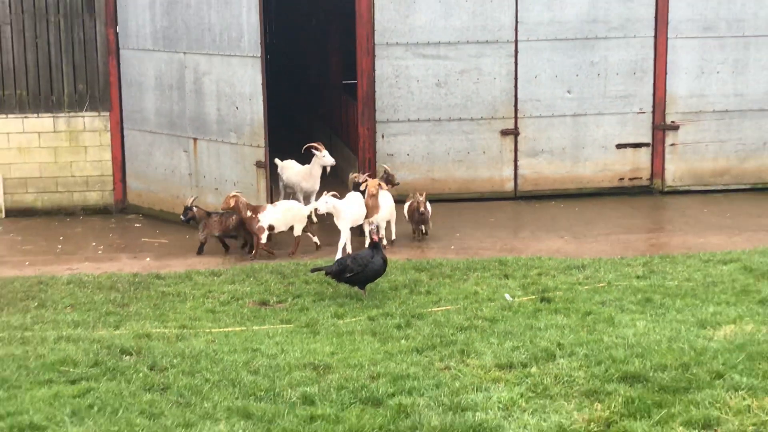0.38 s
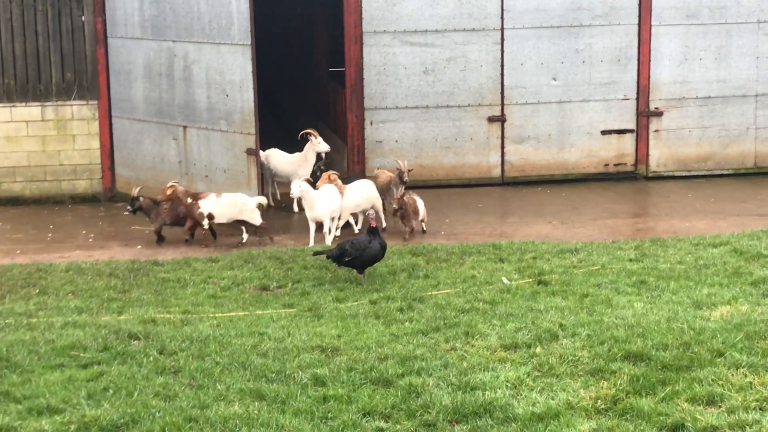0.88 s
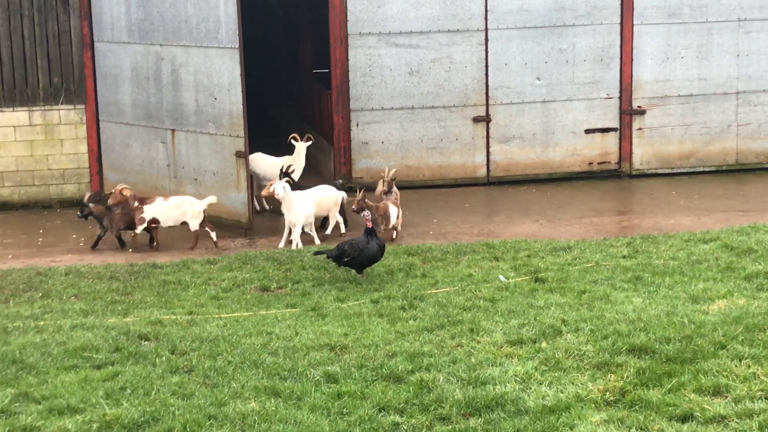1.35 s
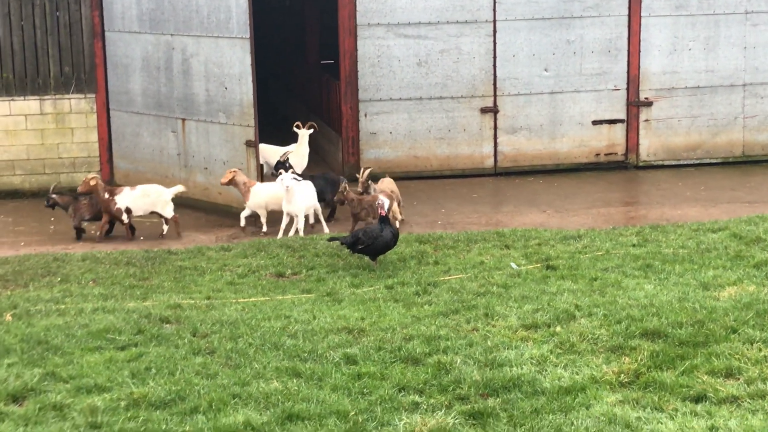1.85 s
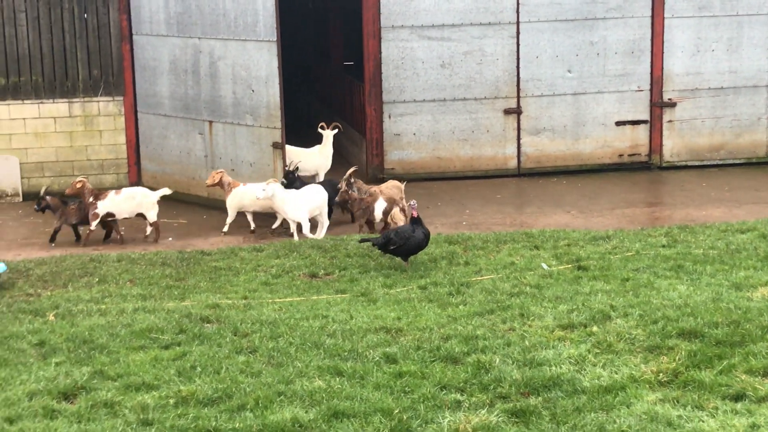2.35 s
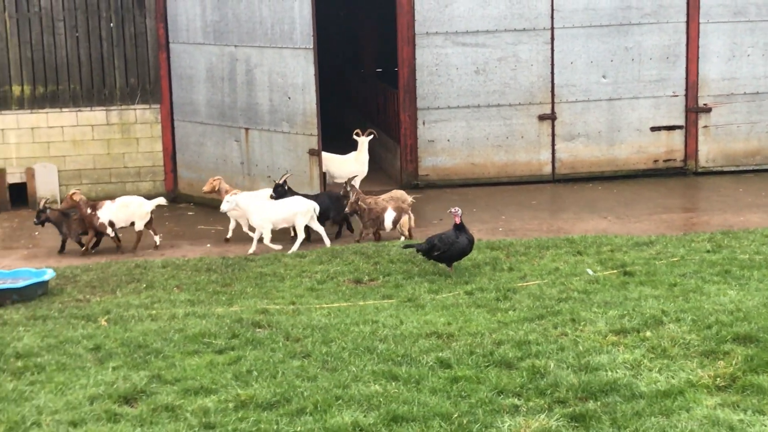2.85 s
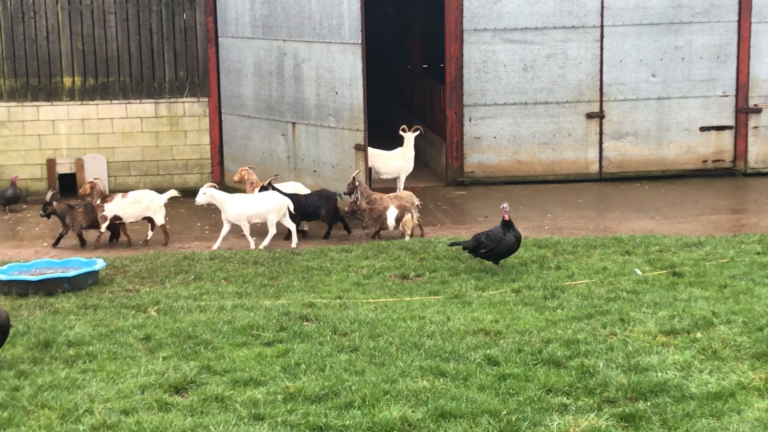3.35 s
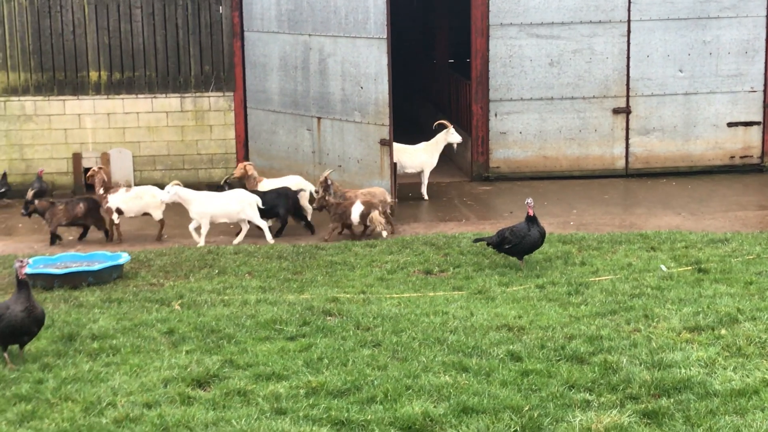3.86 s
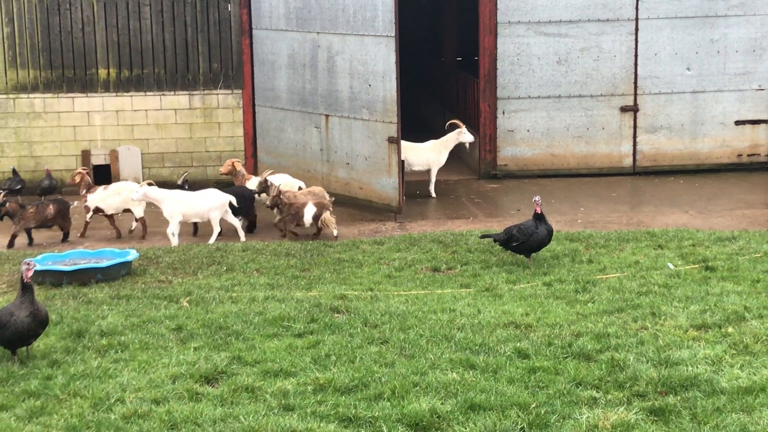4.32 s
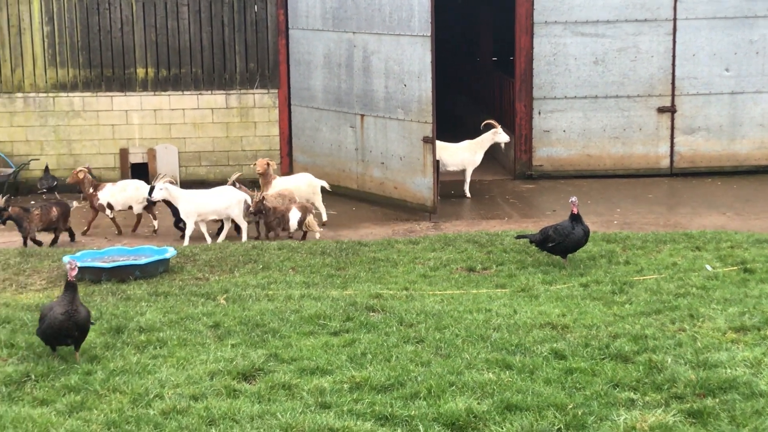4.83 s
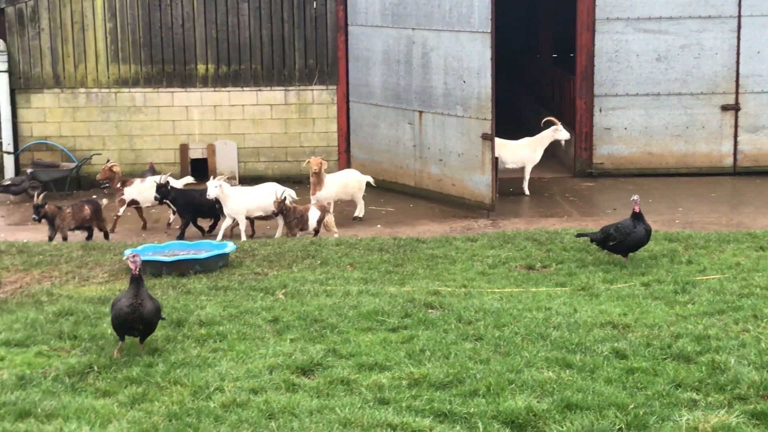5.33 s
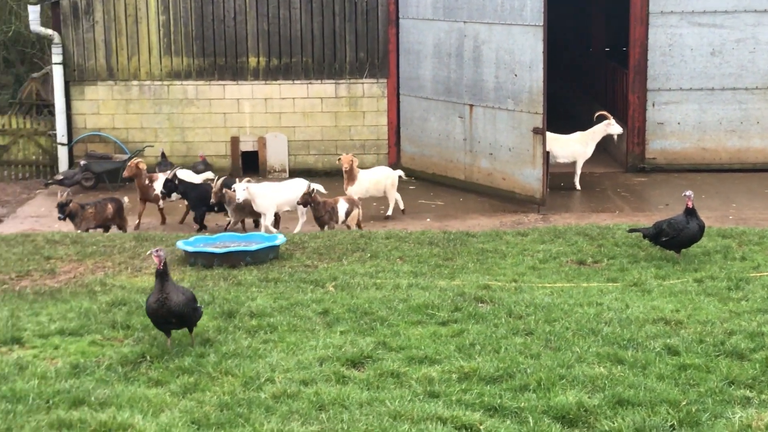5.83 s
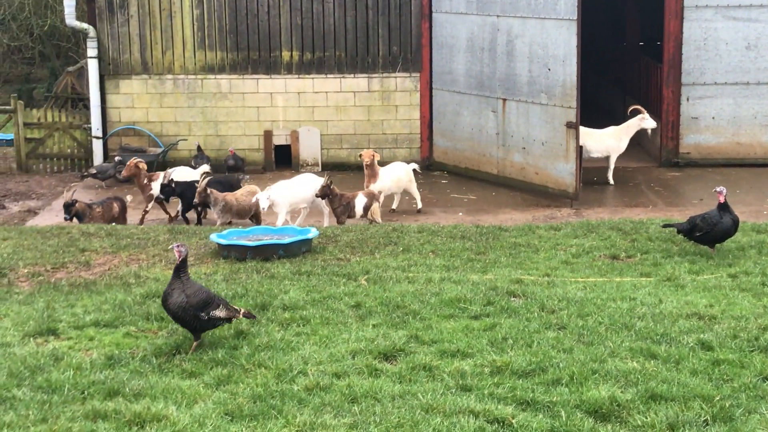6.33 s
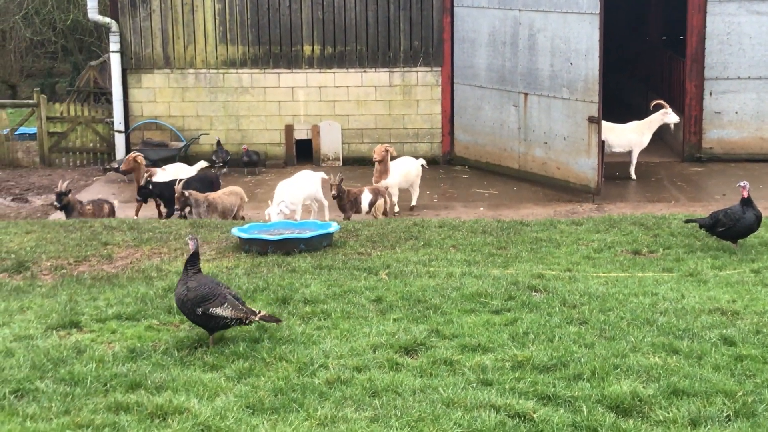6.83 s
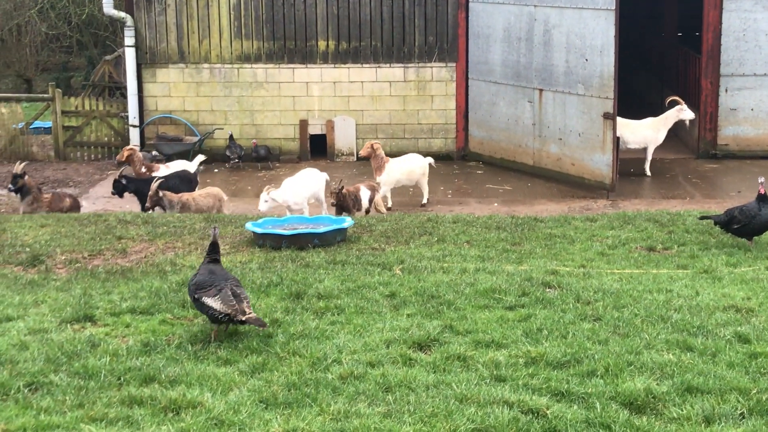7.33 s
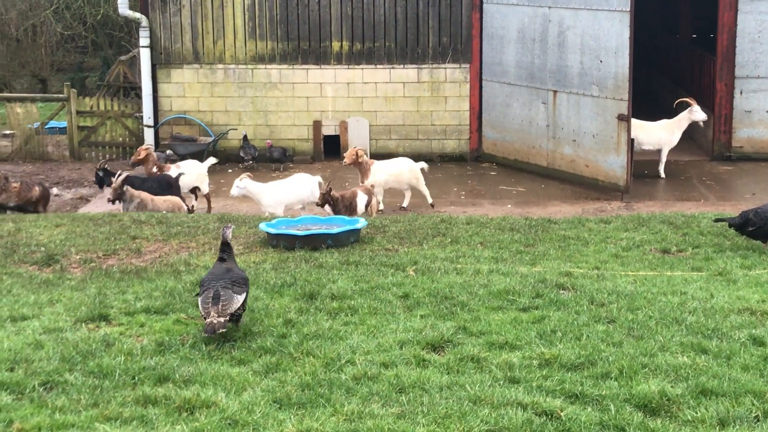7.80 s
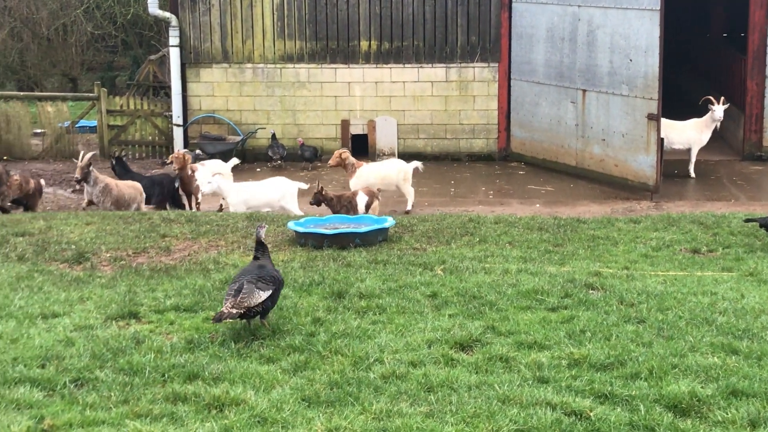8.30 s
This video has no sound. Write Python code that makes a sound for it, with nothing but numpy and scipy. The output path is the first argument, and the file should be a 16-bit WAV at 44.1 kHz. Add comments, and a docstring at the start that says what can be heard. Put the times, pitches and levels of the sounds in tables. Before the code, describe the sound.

Loud, short turkey yelps ring across a farmyard, followed by weaker hoarse clucks, with faint songbirds, light hoof taps and soft swishing steps.

```python
"""A farmyard in front of a sheet-metal shed: a near turkey yelps eight times, two membranes and rasping air;
a farther one clucks hoarsely on, a falling stack of partials through a throat peak, with a purr of clicks.
Songbirds whistle and trill in the hedges as gliding sines, goats' hooves ring briefly on wet concrete,
and short swishes of noise come in loose runs. Scattered reflections answer the animals over a low hum,
distant traffic and air."""
import sys
import numpy as np
from scipy import signal
from scipy.fft import rfft, irfft, next_fast_len
from scipy.io import wavfile
from scipy.ndimage import uniform_filter1d

SR = 44100
rng = np.random.default_rng(int(sys.argv[2]) if len(sys.argv) > 2 else 0)


def wrap_up_sound(samples):
    """Save the sound to the file named by the first command line argument, as 16-bit audio."""
    columns = np.atleast_2d(samples).T
    # keep every value between -1 and 1, then stretch to whole-number steps
    tamed = np.clip(columns, -1, 1)
    steps = np.round(tamed * 32767).astype(np.int16)
    wavfile.write(sys.argv[1], SR, steps)


def ratio_of_db(decibels):
    """Turn decibels (scalar or array-like) into linear amplitude factors; 0 dB maps to 1."""
    return 10 ** (np.asarray(decibels, float) / 20)


N = 382788  # samples

# Near turkey, one table a yelp. Each row: time in seconds, pitch in Hz, level in dB,
# beak opening as overtone level in dB.
YELPS = [
    [(0.194, 1238, -55, -7), (0.201, 1499, -34.5, -6), (0.21, 1421, -30, -42), (0.216, 1213, -28, -4.5),
     (0.262, 1190, -24.5, -20), (0.269, 1298, -29.5, -16), (0.318, 1275, -35.5, -10.5),
     (0.351, 1354, -38, -15), (0.363, 1507, -48, -13)],
    [(0.59, 1303, -53, -26), (0.596, 1478, -39.5, -34), (0.606, 1558, -24, -12), (0.612, 1207, -26.5, -3.5),
     (0.65, 1217, -21, -17.5), (0.656, 1323, -26, -13), (0.707, 1295, -33, -5.5), (0.755, 1505, -52, -20)],
    [(0.982, 1470, -46.5, -3), (0.994, 1516, -28.5, -13), (0.997, 1447, -27, -16),
     (1.003, 1207, -24.5, -3.5), (1.042, 1329, -23.5, -15), (1.069, 1314, -30.5, -1.5),
     (1.108, 1290, -35, -22), (1.138, 1346, -46, -7)],
    [(1.432, 1290, -50, -31), (1.444, 1400, -29.5, -11.5), (1.453, 1466, -26.5, -13),
     (1.459, 1383, -25.5, -13), (1.467, 1323, -23.5, -33), (1.472, 1122, -25.5, -11.5),
     (1.494, 1117, -21, -32), (1.499, 1316, -26.5, -9), (1.6, 1265, -34, -12), (1.62, 1217, -44, -43)],
    [(1.984, 1170, -40.5, -12), (1.996, 1459, -29, -18), (2.018, 1295, -27, -11.5), (2.024, 1109, -27, -14),
     (2.05, 1144, -22, -17.5), (2.078, 1101, -23.5, -26), (2.083, 1271, -27, -13.5),
     (2.137, 1234, -30.5, -16.5), (2.161, 1042, -27, -28), (2.178, 1150, -43, -15)],
    [(2.551, 1085, -64, -5), (2.56, 1488, -27, -44), (2.566, 1384, -31.5, -32), (2.572, 1213, -28.5, -17),
     (2.641, 1133, -26, -23.5), (2.668, 1208, -27.5, -38), (2.676, 1094, -27, -29), (2.735, 1035, -30, -31),
     (2.749, 1076, -49.5, -8.5)],
    [(3.214, 1287, -53, -40), (3.226, 1310, -33.5, -9), (3.256, 1119, -31.5, -11.5), (3.31, 1080, -24, -20),
     (3.337, 1214, -25, -39), (3.346, 1050, -25.5, -21), (3.409, 964, -29, -25), (3.415, 1070, -32.5, -32),
     (3.427, 1010, -53.5, -24)],
    [(3.675, 1250, -54, -25), (3.681, 1428, -31, -13), (3.69, 1427, -22.5, -38), (3.696, 1199, -28.5, -5.5),
     (3.745, 1141, -24.5, -25.5), (3.753, 1272, -24.5, -17.5), (3.81, 1244, -30, -16.5),
     (3.843, 1056, -30, -51), (3.853, 1080, -29.5, -28), (3.864, 1160, -59, -30)],
]
# The voice of each yelp. Each row: pitch of the lower membrane in Hz, its side tones in dB, rasp in dB,
# shine of the highest partials in dB, length of the rough voice break in seconds.
YELP_VOICE = [(800, -13.5, -23.5, -4, 0.0071), (800, -18.5, -30, -2, .004), (850, -19, -26, -9, 0.014),
              (800, -26, -27, -8.5, 0.0074), (800, -45, -22.5, -3.5, 0.018), (800, -26, -19.5, -7.5, 0.059),
              (600, -31, -32, -6.5, 0.0022), (800, -21, -23.5, -7.5, .03)]
# Throat and beak resonances of the yelp. Each row: frequency in Hz, gain in dB.
YELP_THROAT = [(250, -29), (500, -15.5), (800, -7.5), (1500, 7), (2500, -8.5), (3800, -3.5), (5000, -18.5),
               (6300, -7), (8500, -12), (11000, -25), (15000, -19.5)]
# Spectrum of the air rasping in the yelp. Each row: frequency in Hz, relative level in dB.
RASP = [(400, -37.5), (1400, 9), (2300, -8.5), (4300, -2.5), (6500, -17), (15000, -33)]
# Far turkey, one table a cluck. Each row: time in seconds, pitch in Hz, level in dB.
CLUCKS = [
    [(4.414, 800, -70), (4.428, 790, -45), (4.44, 747, -47.5), (4.448, 692, -41), (4.458, 670, -49),
     (4.485, 643, -69)],
    [(4.724, 800, -61), (4.746, 774, -44), (4.78, 730, -46), (4.818, 708, -63)],
    [(5.033, 840, -64), (5.056, 855, -35.5), (5.074, 844, -51.5), (5.1, 800, -50), (5.112, 760, -52),
     (5.122, 740, -47), (5.15, 630, -67)],
    [(5.355, 845, -60), (5.385, 862, -37.5), (5.405, 728, -53), (5.43, 614, -50), (5.445, 760, -47),
     (5.465, 730, -60)],
    [(5.675, 892, -62), (5.695, 863, -42), (5.706, 634, -49.5), (5.72, 644, -43.5), (5.732, 645, -54),
     (5.742, 636, -41), (5.76, 632, -50), (5.785, 630, -84)],
    [(6.008, 860, -60), (6.027, 837, -39.5), (6.036, 675, -53.5), (6.075, 630, -43.5), (6.095, 610, -57),
     (6.12, 603, -68)],
    [(6.357, 792, -58), (6.369, 800, -43), (6.405, 855, -40.5), (6.413, 636, -47), (6.43, 632, -42),
     (6.454, 636, -78)],
    [(7.135, 773, -59), (7.152, 800, -40.5), (7.168, 739, -37), (7.187, 558, -55), (7.2, 618, -43.5),
     (7.208, 720, -58)],
]
# The voice of each cluck. Each row: relative neck length (longer lowers the throat's peak),
# lift of the overtones at the start in dB, rasp when loudest in dB.
CLUCK_VOICE = [(1.24, -16, -13.5), (1.08, 9, -12), (1.09, 7, -15), (1.05, 8, -14.5), (0.91, 4.5, -7),
               (0.94, -1, -8.5), (0.94, 1, -10.5), (1.374, -2.5, -27.5)]
# Throat resonances of the cluck. Each row: frequency in Hz, gain in dB.
CLUCK_THROAT = [(500, -12.5), (900, -16.5), (1400, -1.5), (1900, 1.5), (2500, -10), (3400, -15),
                (5000, -24), (9000, -40.5)]
# Soft turkey peeps. Each row: start in seconds, length in seconds, first pitch in Hz, last pitch in Hz,
# peak level in dB.
PEEPS = [(7.064, 0.045, 1072, 1027, -52), (7.104, .036, 1030, 896, -46), (7.203, 0.018, 850, 1140, -45.5),
         (8.054, 0.032, 1440, 1240, -55), (8.14, .03, 1290, 1360, -67), (8.444, 0.055, 1230, 1495, -64)]
# Whistled songbird notes. Each row: start in seconds, length in seconds, first pitch in Hz,
# last pitch in Hz, peak level in dB.
WHISTLES = [ (0.038, 0.024, 4190, 3400, -52.5), (0.099, 0.032, 4630, 3860, -51.5),
            (0.139, 0.043, 6730, 5500, -56.5), (0.921, 0.026, 5200, 6340, -67),
            (1.21, 0.038, 3600, 3900, -60), (1.232, .035, 5500, 7140, -61), (1.3, 0.038, 4860, 5600, -61.5),
            (1.43, .047, 3600, 4250, -57), (1.935, 0.027, 3900, 4300, -63),
            (2.204, 0.12, 4300, 3550, -58.5), (2.316, 0.064, 4360, 3900, -63),
            (2.98, 0.11, 7046, 6800, -73), (2.984, 0.075, 7890, 7450, -76), (3.11, 0.065, 3580, 3630, -69),
            (3.17, 0.035, 4900, 5280, -65.5), (3.198, 0.038, 4970, 4780, -68),
            (3.38, 0.062, 4950, 4600, -70), (3.45, .03, 4600, 4520, -68), (3.61, 0.065, 8000, 7000, -51),
            (3.603, 0.061, 9680, 8260, -56), (4.261, 0.026, 2500, 2160, -63),
            (4.301, 0.025, 2130, 2440, -61.5), (4.299, 0.028, 3400, 3780, -59.5),
            (4.422, 0.017, 5400, 6000, -68), (4.433, 0.078, 6000, 6000, -60.5),
            (4.425, 0.096, 5020, 4990, -65), (4.627, 0.079, 6700, 6710, -62),
            (4.652, 0.031, 5800, 5050, -58.5), (4.662, 0.13, 4990, 4925, -59.5),
            (4.69, 0.11, 6180, 6300, -64.5), (4.921, .045, 3200, 3550, -65.5),
            (4.966, 0.049, 3550, 3940, -58.5), (5.02, 0.051, 3950, 4300, -57),
            (5.193, .022, 3930, 3170, -59), (5.215, 0.054, 3650, 3860, -56),
            (5.278, 0.032, 3900, 4310, -56), (5.455, 0.049, 4500, 3670, -66),
            (5.501, 0.073, 3570, 3150, -64), (6.152, 0.045, 3450, 2950, -61.5),
            (6.195, 0.052, 2850, 2730, -64), (6.29, 0.022, 3100, 3400, -57),
            (6.315, 0.022, 3330, 2000, -50), (6.486, 0.037, 3870, 3850, -59),
            (6.553, 0.053, 4500, 4450, -68), (6.63, 0.053, 4350, 4250, -67), (6.693, .03, 4200, 4100, -66),
            (6.895, 0.036, 5750, 5684, -69.5), (6.95, .055, 5940, 6190, -75),
            (7.651, 0.084, 8200, 8500, -69.5), (7.672, 0.038, 7640, 7900, -64.5),
            (7.688, .06, 4110, 3410, -64), (7.745, 0.026, 3620, 3030, -63), (7.81, 0.1, 7620, 8050, -64),
            (7.885, .068, 8200, 8460, -68), (7.955, 0.058, 7200, 7735, -66.5),
            (8.013, .04, 6900, 7400, -69), (8.058, 0.031, 6970, 7200, -65.5),
            (8.087, 0.055, 7768, 7230, -62), (8.14, 0.036, 8500, 8340, -60),
            (8.188, 0.068, 6950, 7000, -64.5), (8.2, 0.058, 7600, 7840, -66),
            (8.324, 0.013, 4800, 7600, -60), (8.327, .03, 7300, 7940, -57.5),
            (8.35, 0.083, 8060, 7730, -57.5), (8.466, 0.028, 8700, 8500, -62),
            (8.501, 0.043, 8550, 8560, -62.5), (8.582, .022, 3760, 3870, -51),
            (8.591, .045, 4550, 3530, -58), (8.596, 0.054, 3550, 3240, -56.5),
            (8.647, 0.038, 3800, 3500, -57.5), ]
# Buzzy songbird trills, one table a trill. Each row: time in seconds, top pitch in Hz,
# level in dB ahead of the mix, down-slur in Hz, notes a second.
TRILLS = [
    [(1.26, 7130, -52, 600, 81), (1.35, 7230, -51, 887, 60), (1.5, 7050, -53.5, 1208, 43),
     (1.75, 6800, -64, 1170, 55)],
    [(6.54, 8760, -65, 500, 28), (6.65, 7790, -59.5, 600, 31), (6.85, 7100, -58, 900, 28),
     (7.0, 7350, -62, 300, 19), (7.16, 6850, -74, 300, 43)],
]
# Short swishes, as of feet through wet grass. Each row: middle in seconds, level in dB, length in ms.
PUFFS = [(.026, -53.5, 37), (.78, -63.5, 33), (.97, -53.5, 31), (1.19, -50, 23), (1.388, -50.5, 42),
         (1.602, -49.5, 41), (1.81, -47.5, 20), (1.92, -56, 22), (2.01, -57.5, 84), (2.211, -52.5, 44),
         (2.385, -55.5, 26), (2.413, -52, 17), (2.815, -56.5, 31), (3.005, -55, 11.6), (3.042, -61, 41),
         (3.945, -57, 14), (4.115, -60.5, 38), (5.866, -63, 7.9), (6.027, -51.5, 30), (6.259, -51.5, 18.5),
         (6.526, -50, 31), (6.766, -47, 19), (7.018, -48.5, 22), (7.257, -48.5, 26), (7.49, -47, 26)]
# Spectrum of the swishes ahead of the tilt. Each row: frequency in Hz, relative level in dB per Hz.
PUFF_COLOUR = [(180, -53.5), (300, -15.5), (541, -37), (884, 9), (1170, 0.5), (1310, 7), (1880, -1),
               (2360, -4), (2650, -3), (15000, -25.5)]
# Hooves on wet concrete. Each row: time in seconds, level in dB ahead of damping, ring in Hz.
HOOVES = [(0.491, -55.5, 244), (0.972, -53, 295), (1.174, -56.5, 251), (1.376, -51.5, 290),
          (1.464, -62, 208), (1.573, -45.5, 644), (1.729, -52, 240), (1.774, -41, 670), (2.378, -46.5, 690),
          (2.591, -47, 304.6), (2.748, -52.5, 265), (2.8474, -46.5, 1138), (2.9413, -47, 1004),
          (3.0, -51, 311.7), (3.5177, -52, 5950), (3.5379, -43, 3860), (3.599, -56.5, 195),
          (3.848, -48.5, 657), (4.011, -55, 185), (4.0314, -47.5, 1220), (4.89, -51, 630),
          (4.916, -53, 536), (5.164, -46, 613), (5.6087, -53, 900), (5.885, -40.5, 3300),
          (6.449, -41.5, 5500), (6.6428, -46, 4160), (6.936, -48, 447), (6.965, -50, 392),
          (7.4205, -50.5, 7500), (7.4485, -45, 6500), (8.2027, -48.5, 2620), (8.227, -40, 2800)]
# Rustle of the herd. Each row: time in seconds, level in dB.
RUSTLE = [(0, -67), (1.5, -66.5), (3, -66.5), (4.3, -73), (5.6, -71.5), (6.5, -64.5), (7.5, -67.5),
          (8, -74.5), (8.68, -72.5)]
# Spectrum of the rustle. Each row: frequency in Hz, relative level in dB per Hz.
RUSTLE_COLOUR = [(300, -16), (900, 0), (2500, -1.5), (5000, -10.5), (12000, -20)]
# Activity of the distant songbirds. Each row: time in seconds, gain in dB ahead of the mix.
CHATTER = [(0, -41), (.3, -58), (1.5, -53.5), (3.2, -70), (4, -58), (4.4, -64.5), (5.5, -73), (6.3, -66),
           (7.2, -71), (8.68, -94)]
# Low grumbles. Each row: start in seconds, length in seconds, level at the onset in dB.
GRUMBLE = [(5.581, 0.57, -57), (8.1, 0.477, -68)]
# Wavering hum. Each row: time in seconds, level in dB.
HUM = [(0.0, -67), (1.14, -58.5), (1.52, -63.5), (5.36, -64), (5.51, -58), (8.12, -65.5), (8.58, -58),
       (8.68, -89)]
# Spectrum of traffic and air. Each row: frequency in Hz, relative level in dB per Hz.
YARD = [(15, -41.5), (25, -28.5), (53, 9.5), (91, -1.5), (119, -4.5), (156, -5), (402, -19), (979, -13.5),
        (1870, -39), (3290, -27.5), (4940, -29.5), (6290, -27), (10500, -44.5), (14500, -31),
        (15700, -41.5)]

# Yelp: rasp grows with the beak opening (dB per dB, around a middle opening),
# side tones with effort (dB per dB); both fade along the call.
BEAK_MID_DB, RASP_PER_BEAK, RASP_FADE_DB_S = -15.5, 0.5, 19.5
SIDE_PER_EFFORT, SIDE_FADE_DB_S = 0.9, 33
# Where the pitch first drops the voice breaks: rasp jumps up, the pitch shakes, the tone stutters.
BREAK_RASP_DB, BREAK_JITTER, RASP_TOP_DB = 11, 0.02, -11
STUTTER_HZ, STUTTER_DEPTH = 150, 0.65
# Cluck: overtones die along the call; the further the voice sinks, the larger the share of rasp (dB per dB).
CLUCK_DULL_DB_S, RASP_PER_WEAKNESS = 300, 0.55
# Purr: start in seconds, number of clicks, clicks a second, typical level ahead of damping and ring.
PURR_S, PURR_CLICKS, PURR_PER_S, PURR_DB, PURR_HZ = 1.71, 5, 145, -35, 1627
# Notes swell to their peak at this share of their length; their ends lie this far below.
NOTE_PEAK_SHARE, NOTE_START_DB, NOTE_END_DB = 0.33, -3.5, -7
PUFF_TILT_DB = 1.3  # extra brightness per octave
GRUMBLE_FADE_DB_S = 14
HUM_HZ, HUM_WIDTH_HZ = 105.5, 5.9  # middle pitch and spread of its wander
YARD_DB = -60
SHED_T60_S, SHED_DB, HEDGE_DB, YARD_WALL_DB = 0.65, -15.5, -5, -7


def unit(x):
    """Scale to rms 1."""
    return x / np.sqrt(np.mean(x ** 2))


def colour(points, hz):
    """Gain of a (Hz, dB) spectrum at hz, read along log frequency."""
    f, db = np.transpose(points)
    return ratio_of_db(np.interp(np.log(np.maximum(hz, 1)), np.log(f), db))


def noise(points, size=N):
    """Noise of a given spectrum, rms 1."""
    n = next_fast_len(size)
    spectrum = rfft(rng.standard_normal(n)) * colour(points, np.fft.rfftfreq(n, 1 / SR))
    return unit(irfft(spectrum, n)[:size])


def hump(hz, width_hz, size=N):
    """Noise in one resonance, rms 1."""
    n = next_fast_len(size)
    detune = (np.fft.rfftfreq(n, 1 / SR) - hz) / width_hz
    spectrum = rfft(rng.standard_normal(n)) / (1 + detune ** 2)
    return unit(irfft(spectrum, n)[:size])


def walk(rate, size=N):
    """Smooth random wander, rms 1; a higher rate wanders faster."""
    k = max(int(SR / rate), 1)
    rough = rng.standard_normal(size + 4 * k)
    smooth = uniform_filter1d(uniform_filter1d(rough, k), k)
    return unit(smooth[2 * k:2 * k + size])


def curve(rows):
    """A (s, dB) table as a gain for every sample, practically silent outside it."""
    s, db = np.transpose(rows)
    return ratio_of_db(np.interp(np.arange(N) / SR, s, db, -120, -120))


def spread(rows):
    """Start sample, the columns sample by sample, and a soft-edged gate."""
    s, *columns = np.transpose(rows)
    start = int(s[0] * SR)
    t = np.arange(start, int(s[-1] * SR)) / SR
    gate = np.clip(np.minimum(t - s[0], s[-1] - t) / 0.00082, 0, 1)
    return start, [np.interp(t, s, c) for c in columns], gate


def add(out, start, x):
    """Mix x into out from sample start."""
    x = x[max(-start, 0):N - start]
    out[max(start, 0):max(start, 0) + len(x)] += x


def yelp(rows, lower_hz, side_db, rasp_db, shine_db, break_s):
    """A pure whistle with overtones; a second membrane adds sum and difference tones, air adds rasp."""
    start, (hz, level_db, over_db), gate = spread(rows)
    n = len(hz)
    age = np.arange(n) / SR
    effort_db = level_db - level_db.max()
    side_db = side_db + SIDE_PER_EFFORT * effort_db - SIDE_FADE_DB_S * age

    # the break starts at the highest pitch of the first quarter
    since = age - age[np.argmax(hz[:n // 4])]
    broken = np.clip(since / 0.004, 0, 1) * np.exp(-(since / break_s) ** 2)
    rasp_db = rasp_db + RASP_PER_BEAK * (over_db - BEAK_MID_DB) - RASP_FADE_DB_S * age
    rasp_db = np.minimum(rasp_db + BREAK_RASP_DB * broken, RASP_TOP_DB)
    stutter = np.cos(2 * np.pi * np.cumsum(STUTTER_HZ * (1 + 0.29 * walk(60.8, n))) / SR)

    jitter = 0.0027 + 0.048 * ratio_of_db(rasp_db) + BREAK_JITTER * broken
    upper = 2 * np.pi * np.cumsum(hz * (1 + jitter * walk(400, n))) / SR
    lower = 2 * np.pi * np.cumsum(lower_hz * (1 + 0.016 * walk(110, n))) / SR
    # the highest partials need effort: they fade first as the call weakens
    dull_db = shine_db + 1.56 * effort_db

    def throat(f):
        """Gain of one partial, more ragged the higher it lies."""
        high = np.clip((f - 4200) / 2500, 0, 1)
        ragged_db = (1.0 + 1.17 * high + 5.7 * ratio_of_db(rasp_db)) * walk(267, n)
        return colour(YELP_THROAT, f) * ratio_of_db(high * dull_db + ragged_db)

    tone = np.sin(upper) * ratio_of_db(0.66 * walk(150, n))
    for k in range(2, 13):
        tone += ratio_of_db(over_db) * throat(k * hz) * np.sin(k * upper + k * k)
    for k in range(0, 10):
        tone += ratio_of_db(side_db) * throat(k * hz + lower_hz) * np.sin(k * upper + lower + k)
        difference = np.sin((k + 1) * upper - lower)
        tone += ratio_of_db(side_db - 5.0) * throat((k + 1) * hz - lower_hz) * difference
    # leaking air pulses with the upper membrane and with the difference of the two
    leak = (1 + 0.13 * np.cos(upper)) * (1 + 0.15 * np.cos(upper - lower)) * ratio_of_db(3.3 * walk(210, n))
    voice = np.sqrt(2) * tone + ratio_of_db(rasp_db) * leak * noise(RASP, n)
    voice = voice * (1 - STUTTER_DEPTH * broken * (1 - stutter) / 2)
    return start, voice * ratio_of_db(level_db) * gate


def cluck(rows, neck, over_db, rasp_db):
    """A hoarse stack; the throat lifts whichever partial lies near its peak, rasp shakes pitch and level."""
    start, (hz, level_db), gate = spread(rows)
    n = len(hz)
    over_db = np.maximum(over_db - CLUCK_DULL_DB_S * np.arange(n) / SR, -25)
    sunk_db = np.maximum.accumulate(level_db) - level_db
    rasp = ratio_of_db(rasp_db + RASP_PER_WEAKNESS * sunk_db)
    shake = np.minimum(rasp, 0.7)
    phase = 2 * np.pi * np.cumsum(hz * (1 + 0.1054 * shake * np.tanh(walk(204, n)))) / SR
    voice = rasp * noise(CLUCK_THROAT, n) * ratio_of_db(8.8 * np.tanh(walk(150, n)))
    for k in np.arange(1, 7, 0.5):
        # strong and weak cycles alternate when hoarse, filling in lines halfway between the partials
        half = np.minimum(0.42 * rasp, 1) if k % 1 else 1
        throat_hz = k * hz * neck
        lift_db = over_db * np.clip((throat_hz - 2050) / 300, 0, 1)
        lift_db = lift_db + 3.3 * shake * np.tanh(walk(116, n))
        gain = half * ratio_of_db(lift_db) * colour(CLUCK_THROAT, throat_hz)
        voice += np.sqrt(2) * gain * np.sin(k * phase + k * k)
    # the breath comes in small jerks
    return start, voice * ratio_of_db(level_db + 2.34 * np.tanh(walk(125, n))) * gate


def knocks(rows, cycles, grit):
    """Each contact is a ring damped within a few cycles, with a speck of grit."""
    out = np.zeros(N)
    t = np.arange(1500) / SR
    for s, db, hz in rows:
        ring = np.sin(2 * np.pi * hz * t) * np.exp(-t * hz / cycles)
        speck = grit * rng.standard_normal(len(t)) * np.exp(-t / 0.0038)
        add(out, int(s * SR), ratio_of_db(db) * (ring + speck))
    return out


def purr():
    """A short creaky purr: a few separate throat clicks, each a damped ring."""
    rows = []
    for k, (size, pitch) in enumerate(rng.standard_normal((PURR_CLICKS, 2))):
        rows.append((PURR_S + k / PURR_PER_S, PURR_DB + 2.5 * size, PURR_HZ * (1 + 0.1 * pitch)))
    return knocks(rows, cycles=9, grit=0.05)


def whistle(rows):
    """A near sine with a slight tremble of pitch and level."""
    start, (hz, level_db), gate = spread(rows)
    n = len(hz)
    tremble_hz = np.minimum(0.012 * hz, 38) * walk(220, n)
    phase = 2 * np.pi * np.cumsum(hz + tremble_hz) / SR
    return start, np.sqrt(2) * np.sin(phase) * ratio_of_db(level_db + 2.94 * walk(120, n)) * gate


def note(s, length, first_hz, last_hz, db):
    """One whistled glide with a quick swell and a slower fade."""
    peak_hz = first_hz + NOTE_PEAK_SHARE * (last_hz - first_hz)
    return whistle([(s, first_hz, db + NOTE_START_DB),
                    (s + NOTE_PEAK_SHARE * length, peak_hz, db),
                    (s + length, last_hz, db + NOTE_END_DB)])


def trill(rows):
    """Tiny down-slurred notes in quick succession."""
    start, (hz, level_db, slur_hz, per_s), gate = spread(rows)
    n = len(hz)
    beat = np.cumsum(per_s * (1 + 0.022 * walk(23.5, n))) / SR % 1  # 0 to 1 through each note
    phase = 2 * np.pi * np.cumsum(hz - slur_hz * beat ** 2) / SR
    return start, np.sin(phase) * np.sin(np.pi * beat) * ratio_of_db(level_db + 1.03 * walk(49, n)) * gate


def puffs():
    """Grainy swishes: coloured noise that swells and dies quickly, with a fainter, wider skirt."""
    out = np.zeros(N)
    t = np.arange(-4410, 4410) / SR
    points = [(hz, d + PUFF_TILT_DB * np.log2(hz / 1500)) for hz, d in PUFF_COLOUR]
    for s, db, ms in PUFFS:
        swell = np.exp(-(t / (ms / 2000)) ** 2) + 0.22 * np.exp(-(t / (ms / 700)) ** 2)
        grain = ratio_of_db(db + 2.4 * walk(490, len(t)))
        add(out, int(s * SR) - 4410, noise(points, len(t)) * grain * swell)
    return out


def shuffle():
    """Many fainter hoof ticks at random, and the herd's rustle, patchy in each band."""
    when, size, pitch = rng.random((400, 3)).T
    ticks = np.transpose([when * N / SR, -60 - 12 * size, 700 * 2 ** (2.5 * pitch)])
    hz = np.fft.rfftfreq(N, 1 / SR)
    whole = rfft(noise(RUSTLE_COLOUR))
    swell = walk(13.8)  # shared by all bands
    rustle = 0
    for lo in 200 * 1.5 ** np.arange(11):
        band = irfft(whole * (hz >= lo) * (hz < 1.5 * lo), N)
        rustle = rustle + band * ratio_of_db(2.2 * swell + 2.4 * walk(8.6) + 2.8 * walk(223))
    return knocks(ticks, cycles=0.59, grit=0.71) + curve(RUSTLE) * rustle


def chatter():
    """Many distant songbirds: short random slurs of like size."""
    out = np.zeros(N)
    for when, pitch, slur, length, size in rng.random((500, 5)):
        s, hz, db = when * N / SR, 3200 + 1500 * pitch, -9 * size
        end = (s + 0.0059 + 0.014 * length, hz + 1500 * (slur - 0.6), db - 3)
        add(out, *whistle([(s, hz, db), end]))
    return curve(CHATTER) * out


def echo(x, t60_s, gap_s, dull_db):
    """Scattered reflections after a short gap; the bright part dies sooner than the rest."""
    t = np.arange(int(1.2 * SR)) / SR
    bright = rng.standard_normal(len(t)) * np.exp(-np.log(1000) * t / (0.23 * t60_s))
    late = noise([(300, 13.5), (1200, -2.5), (9000, dull_db)], len(t))
    late = late * np.exp(-np.log(1000) * t / t60_s)
    tail = (0.5 * bright + late) * np.clip((t - gap_s) / 0.0072, 0, 1)
    return signal.fftconvolve(x, tail / np.sqrt(np.sum(tail ** 2)))[:N]


def grumble():
    """Low rough sounds, noise in one resonance, that set in quickly, fade and stop."""
    t = np.arange(N) / SR
    shape = 0
    for s, length, db in GRUMBLE:
        edges = np.clip(np.minimum((t - s) / 0.042, (s + length - t) / 0.11), 0, 1)
        shape = shape + ratio_of_db(db - GRUMBLE_FADE_DB_S * (t - s)) * edges
    return shape * hump(256, 48) * ratio_of_db(3.3 * walk(33))


def hum():
    """A low sine that wanders in pitch and wavers in level."""
    phase = 2 * np.pi * np.cumsum(HUM_HZ + HUM_WIDTH_HZ * walk(6.09)) / SR
    return curve(HUM) * np.sqrt(2) * np.sin(phase) * ratio_of_db(1.4 * walk(8.6))


def yard():
    """Traffic and air in octave bands that flicker alone, hum, grumbles and the dying echo of an earlier yelp."""
    hz = np.fft.rfftfreq(N, 1 / SR)
    whole = rfft(noise(YARD))
    bands = 0
    for lo in 20 * 2. ** np.arange(10):
        band = irfft(whole * (hz >= lo) * (hz < 2 * lo), N)
        bands = bands + band * ratio_of_db(0.58 * walk(0.83) + 1.4 * walk(15.2))
    earlier = curve([(0, -50), (0.07, -53.5), (0.2, -77)]) * hump(1135, 40)
    return ratio_of_db(YARD_DB) * bands + hum() + grumble() + earlier


def scene():
    """Near and far birds, small sounds, their echoes and the yard."""
    near = puffs() + knocks(HOOVES, cycles=3.0, grit=0.12)
    across, far = purr(), shuffle()
    # birds deep in the hedges arrive mostly as scattered sound
    hidden = chatter()
    for rows, voice in zip(YELPS, YELP_VOICE):
        add(near, *yelp(rows, *voice))
    for rows, voice in zip(CLUCKS, CLUCK_VOICE):
        add(across, *cluck(rows, *voice))
    for row in PEEPS:
        add(across, *note(*row))
    for row in WHISTLES:
        add(far, *note(*row))
    for rows in TRILLS:
        add(hidden, *trill(rows))
    wet = ratio_of_db(SHED_DB) * echo(near, SHED_T60_S, gap_s=0.004, dull_db=-6.5)
    wet += ratio_of_db(HEDGE_DB) * echo(far + hidden, 0.68, gap_s=0.0021, dull_db=-7.5)
    wet += ratio_of_db(YARD_WALL_DB) * echo(across, 0.37, gap_s=0.0022, dull_db=11)
    return (near + across + far + 0.47 * hidden + wet + yard())[None]


def low_pass(x):
    """Removes everything above the highest recorded frequency."""
    return signal.sosfilt(signal.butter(12, 15890, fs=SR, output="sos"), x)


def record(dry):
    """Deliver the finished mix."""
    return low_pass(dry)


dry = scene()
out = record(dry)
wrap_up_sound(out)
```